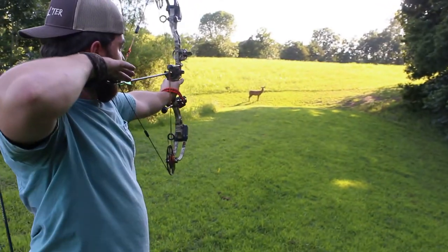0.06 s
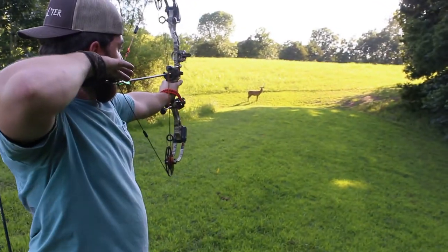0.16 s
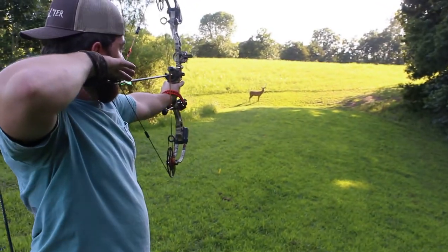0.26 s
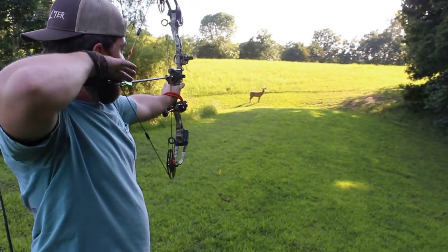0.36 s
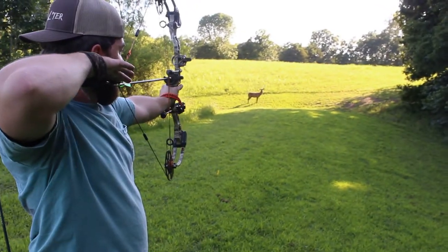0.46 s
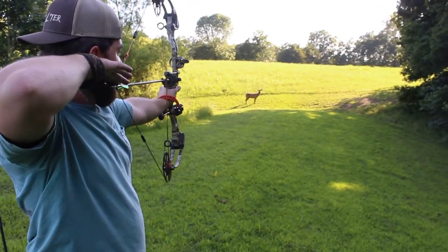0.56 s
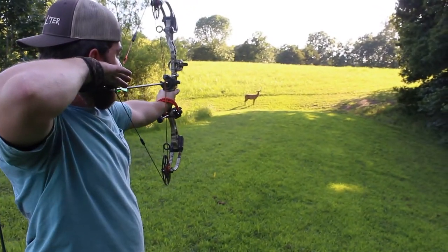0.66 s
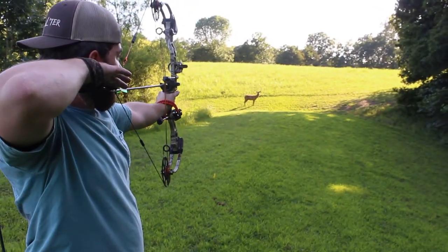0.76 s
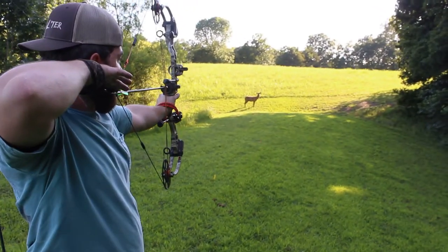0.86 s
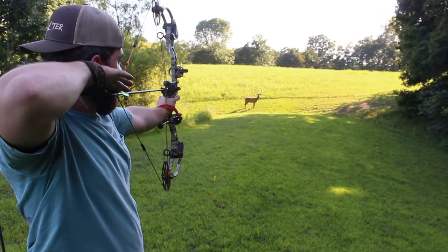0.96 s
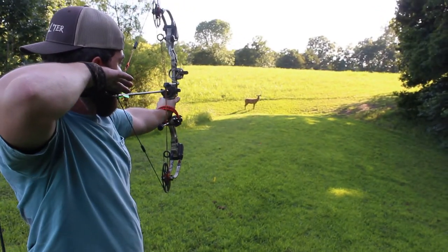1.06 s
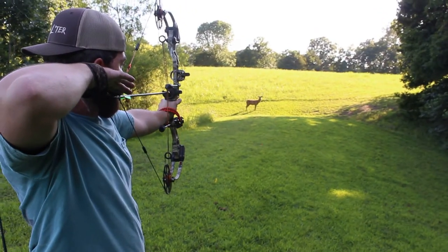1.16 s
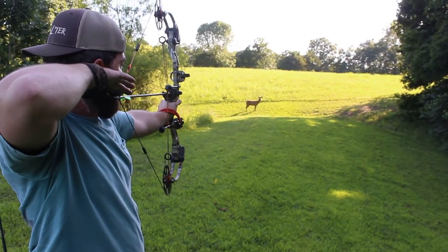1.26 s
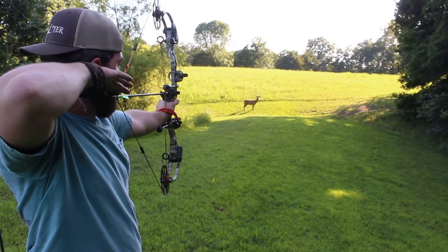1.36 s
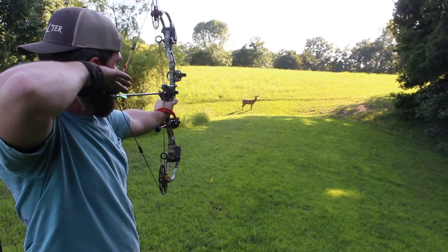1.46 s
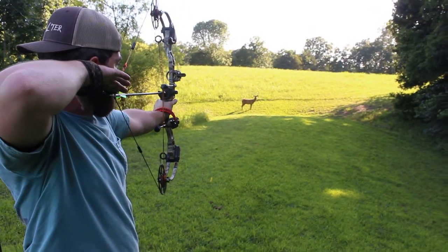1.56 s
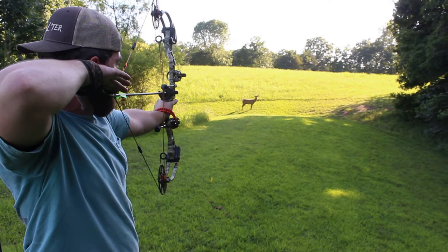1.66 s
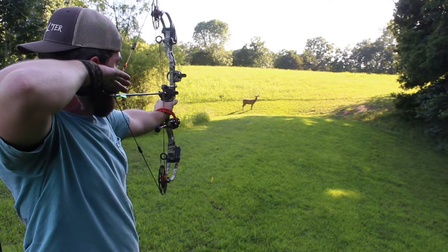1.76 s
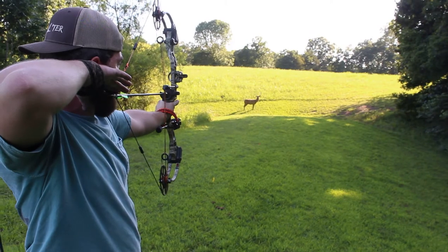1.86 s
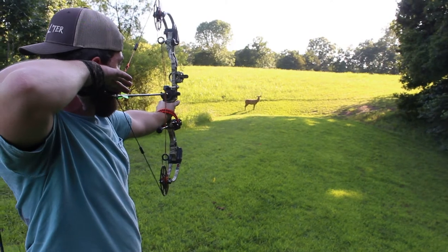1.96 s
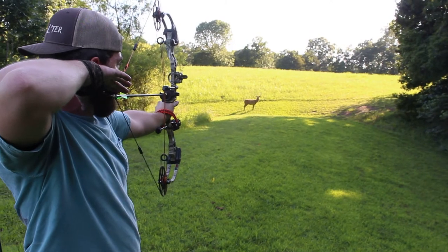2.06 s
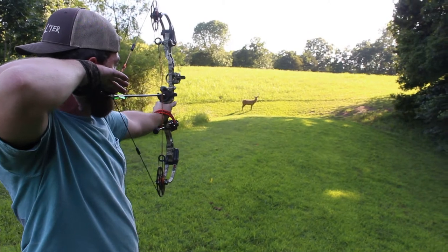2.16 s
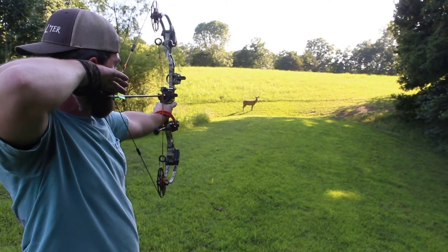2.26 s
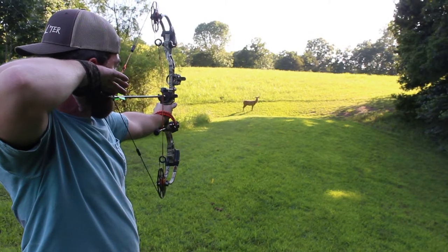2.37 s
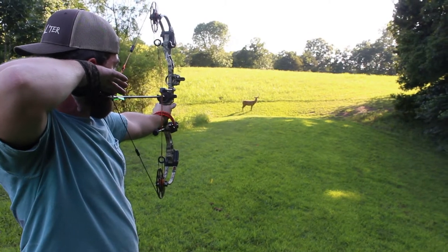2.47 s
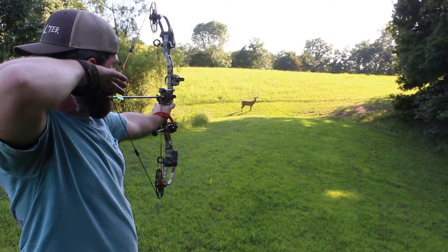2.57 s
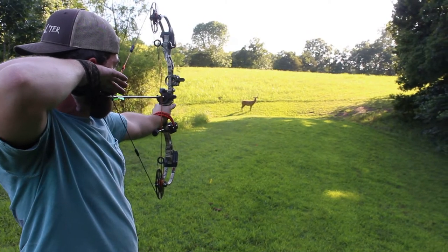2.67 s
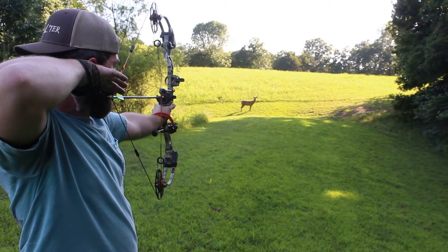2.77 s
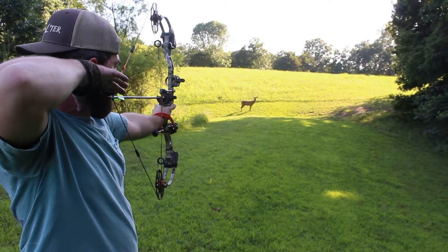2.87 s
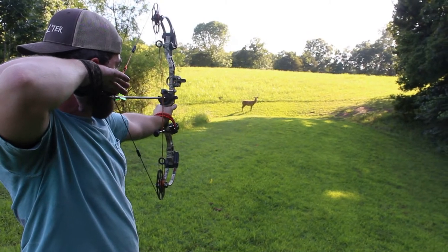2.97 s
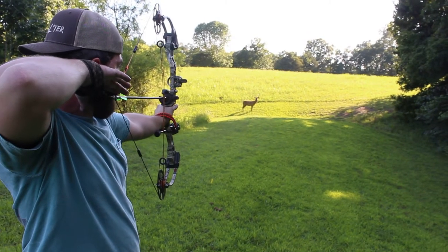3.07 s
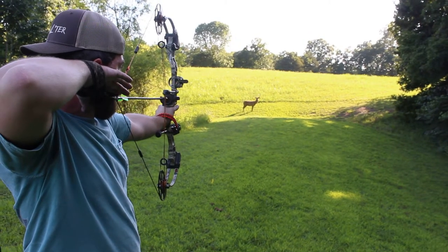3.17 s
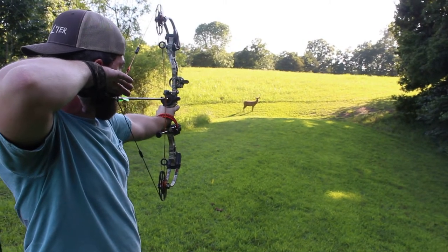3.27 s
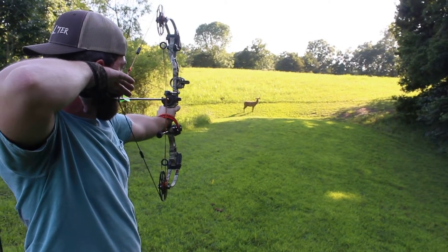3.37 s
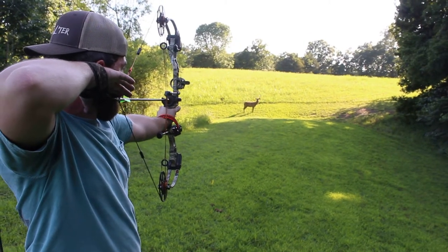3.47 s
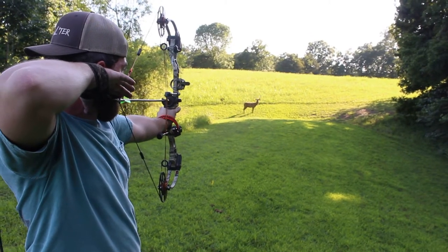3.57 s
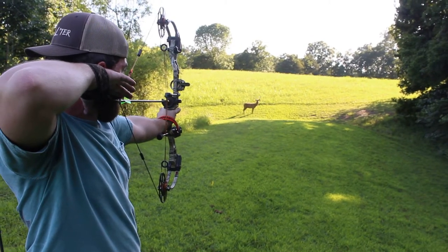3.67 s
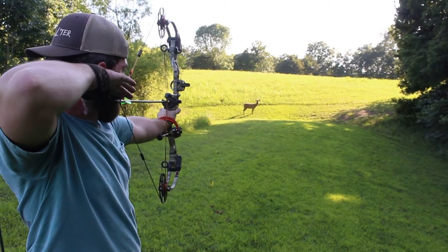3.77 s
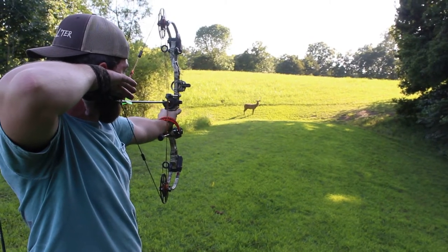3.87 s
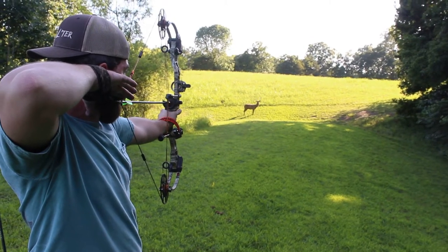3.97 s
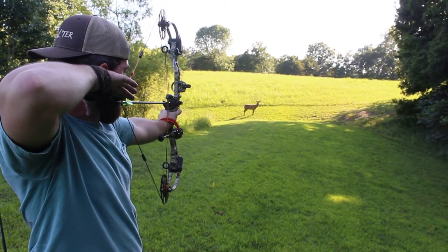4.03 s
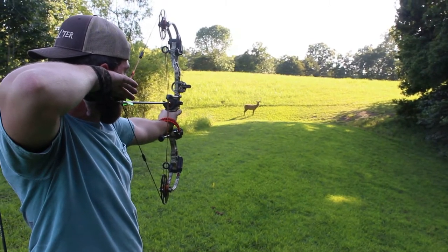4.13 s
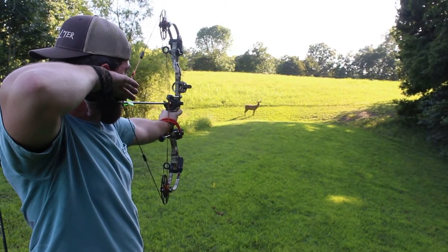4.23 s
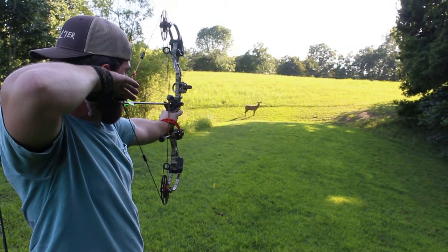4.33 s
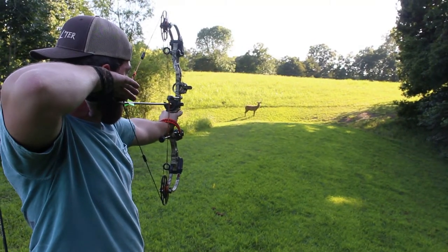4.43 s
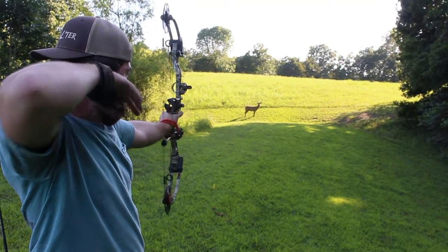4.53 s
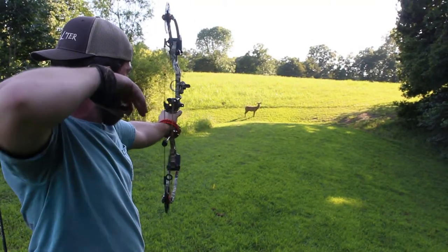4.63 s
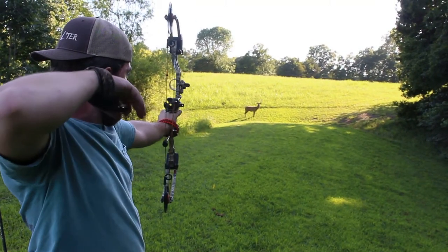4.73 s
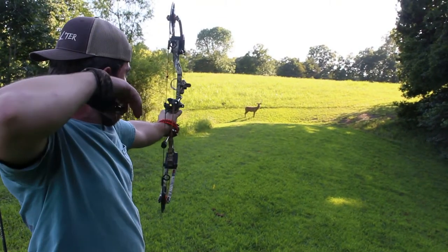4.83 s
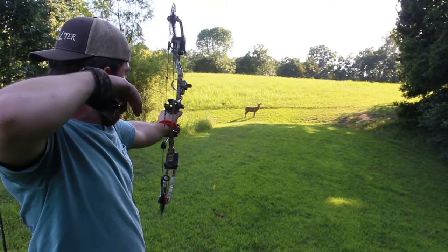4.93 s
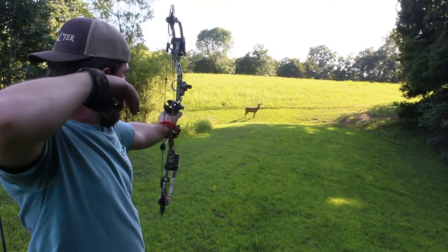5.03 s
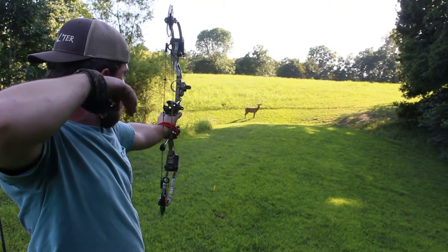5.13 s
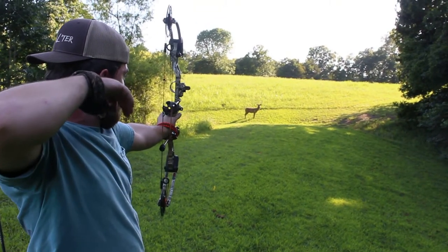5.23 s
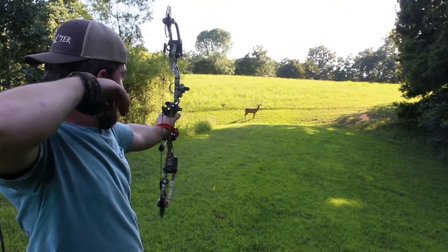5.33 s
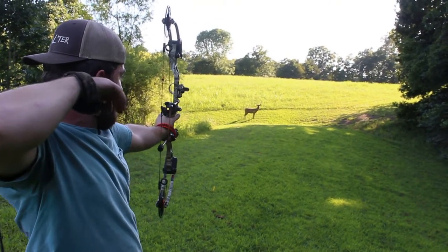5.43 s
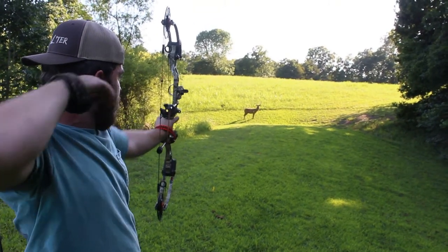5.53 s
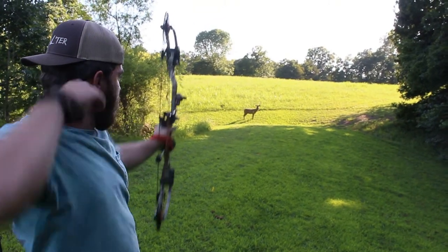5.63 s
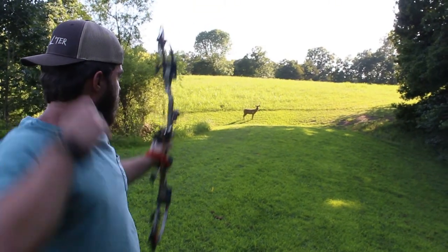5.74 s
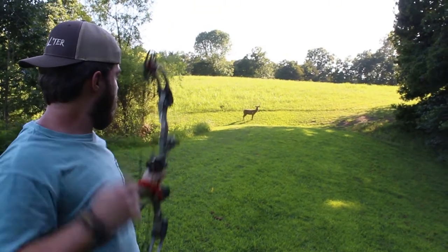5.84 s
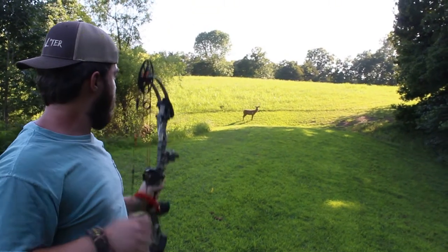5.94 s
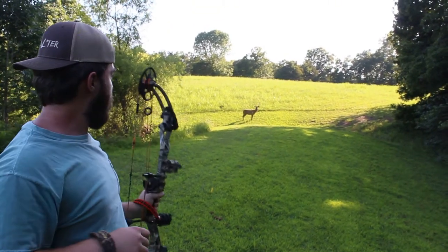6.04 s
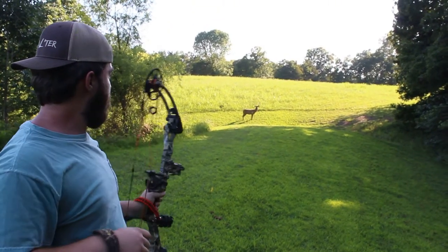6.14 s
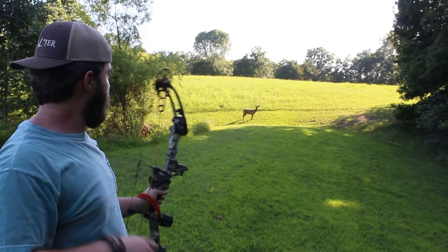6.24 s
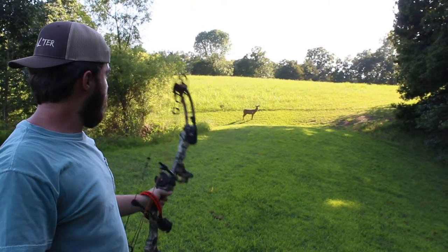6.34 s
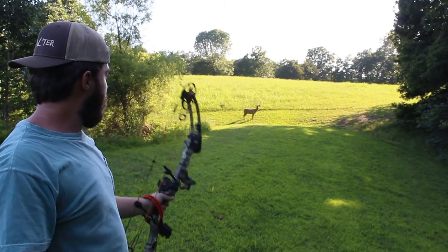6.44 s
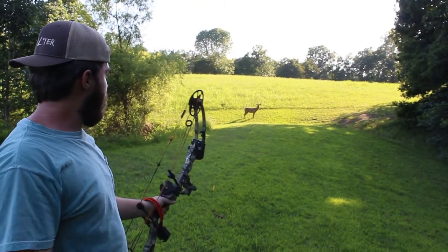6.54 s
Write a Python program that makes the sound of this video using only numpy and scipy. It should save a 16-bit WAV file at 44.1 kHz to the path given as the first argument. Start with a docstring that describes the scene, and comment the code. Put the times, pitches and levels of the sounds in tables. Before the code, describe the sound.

Outdoors in a summer meadow, katydids rasp rhythmically at high pitch while far birds chip and faint ticks sound near the microphone. After a long aim, a bow release clicks and the string slaps very loudly close by, rattling and humming. Under half a second later the arrow cracks and booms into foam, echoing from trees. Low bumps and a dry snap follow as the bow comes down.

```python
"""An archer shoots a compound bow close by, over a summer meadow.
The release clicks, the string slaps home and hums, and the arrow thumps into a foam target that the trees echo.
Struck parts are pulses and dying sines; scrape, rattle, echo and air are shaped noise.
Katydids rasp (pulsing noise), far birds chip (falling tones), a distant roar swells once,
and soft low bumps reach the microphone."""
import sys
import numpy as np
from scipy import signal
from scipy.fft import rfft, irfft
from scipy.io import wavfile
from scipy.ndimage import uniform_filter1d

SR = 44100
rng = np.random.default_rng(int(sys.argv[2]) if len(sys.argv) > 2 else 0)


def master_out(mix):
    """Clip the mix to full scale and print it as 16-bit PCM to the path in sys.argv[1]."""
    frames = np.transpose(np.atleast_2d(mix))
    ceiling = np.clip(frames, -1, 1)
    pcm = np.round(ceiling * 32767).astype(np.int16)
    wavfile.write(sys.argv[1], SR, pcm)


N = 291060
TIME = np.arange(N) / SR


def amp(db):
    """Turns decibels into a gain."""
    return 10 ** (np.asarray(db) / 20)


def unit(x):
    """Scales a signal to an rms of 1."""
    return x / np.sqrt(np.mean(x ** 2) + 1e-20)


def read(points, hz):
    """Reads a table of (Hz, value) along a log-frequency axis."""
    f, value = np.transpose(points)
    return np.interp(np.log(hz + 1), np.log(f + 1), value)


def add(mix, s, sound):
    """Mixes a sound in at time s."""
    part = mix[max(round(s * SR), 0):][:len(sound)]
    part += sound[:len(part)]


def noise(colour):
    """Steady noise of rms 1; the colour lists (Hz, relative dB)."""
    spectrum = rfft(rng.standard_normal(N))
    gain = amp(read(colour, np.fft.rfftfreq(N, 1 / SR)))
    return unit(irfft(spectrum * gain, N))


def click(colour, size=2048):
    """The tightest pulse of this colour that starts at once and never before (minimum phase), peak 1."""
    log_gain = np.log(amp(read(colour, abs(np.fft.fftfreq(size, 1 / SR)))))
    pulse = np.fft.ifft(np.exp(np.conj(signal.hilbert(log_gain)))).real[:size // 2]
    return pulse / abs(pulse).max()


def ring(modes, rise=.0001):
    """Dying sines of a struck object; a mode may start late, and a softer blow builds it up more slowly."""
    out = np.zeros(SR)
    for hz, db, t60, *delay in modes:
        t = np.maximum(TIME[:SR] - sum(delay), 0)
        build_up = 1 - np.exp(-(t / rise) ** 2)
        out += amp(db - 60 * t / t60) * np.sin(2 * np.pi * hz * t) * build_up
    return out


def contact(decay, grit):
    """One hard touch followed by a brief scatter of micro-impacts, which carry mostly treble."""
    scatter = np.diff(rng.standard_normal(SR // 20 + 1))
    force = grit * scatter * np.exp(-TIME[:SR // 20] / decay)
    force[0] += 1
    return force / np.linalg.norm(force)


def swell(s, rise, fall):
    """An envelope that grows to 1 at time s and dies away."""
    return np.exp(-np.maximum((s - TIME) / rise, (TIME - s) / fall))


def strike(rows, body):
    """Plays a body's sound at each (start in seconds, level in dB)."""
    out = np.zeros(N)
    for s, db in rows:
        add(out, s, amp(db) * body)
    return out


def air():
    """Distant wash of leaves and country, drifting slowly in level, and one far swell of low roar."""
    # Colour of the meadow air. Each row: frequency in Hz, relative level in dB.
    air_colour = [(18, -31), (30, -1), (102, -4.5), (130, 0.5), (161, -6), (213, -2.5), (283, -6.5),
                  (476, -9), (1590, -16.5), (2670, -18.5), (3380, -20), (6550, -25), (8500, -26),
                  (11000, -52), (18700, -120)]
    # Colour of the distant roar. Each row: frequency in Hz, relative level in dB.
    roar_colour = [(60, -25), (190, -1), (400, 0), (600, -8), (1000, -17), (2500, -40)]
    air_db, roar_db = -51.5, -56
    roar_at_s, roar_width_s = 3.55, .65
    drift_db = .5 * noise([(2, 0), (10, -23), (60, -100)])
    wash = amp(air_db + drift_db) * noise(air_colour)
    roar_shape = np.exp(-((TIME - roar_at_s) / roar_width_s) ** 2 / 2)
    return wash + amp(roar_db) * noise(roar_colour) * roar_shape


def bird(smear_hz=230):
    """Thin chips that all fall in pitch at the same rate, smeared and prolonged by the woods."""
    # Far bird chips. Each row: start in seconds, starting pitch in Hz, level in dB before shaping.
    chips = [(.33, 7350, -57), (1.24, 6950, -59.5), (1.57, 4760, -58), (2.15, 7380, -51.5),
             (2.3, 3180, -56), (3.18, 7340, -51.5), (3.21, 2780, -56.5), (3.405, 2750, -54.5),
             (4.045, 7280, -55.5), (5.31, 7450, -54), (6.22, 7180, -57.5)]
    fall_hz_per_s, rise_s, decay_s = 4800, .0075, .06
    woods_t60_s, woods_db = .8, -2
    out, t = np.zeros(N), TIME[:SR // 3]
    blur = noise([(smear_hz / 2, 0), (smear_hz, -6), (500, -25), (2000, -80)])
    envelope = (1 - np.exp(-t / rise_s)) * np.exp(-t / decay_s)
    for s, hz, db in chips:
        tone = np.sin(2 * np.pi * np.cumsum(hz - fall_hz_per_s * t) / SR)
        add(out, s, amp(db) * tone * envelope)
    woods = rng.standard_normal(SR) * amp(-60 * TIME[:SR] / woods_t60_s)
    tail = signal.fftconvolve(out, woods / np.linalg.norm(woods))[:N]
    return out * blur + amp(woods_db) * tail


def lisp_level(count=24):
    """Rounded lisps follow the beat of each bout, each a little off in time and strength."""
    # The nearest katydid sings quick short lisps, then long ones, then slightly slower still.
    # Each row: first lisp in seconds, end in seconds, period in seconds, lisp length in seconds, level in dB.
    bouts = [(.02, 1.22, .0975, .076, -57.2), (1.315, 3.3, .1898, .118, -55.7),
             (3.422, 6.7, .1974, .12, -55.8)]
    spread_db, jitter_s = .7, .002
    level = np.zeros(N)
    for start, end, period, length, db in bouts:
        late, louder = rng.standard_normal((count, 2)).T
        beats = start + period * np.arange(count)
        starts = (beats + jitter_s * late)[beats < end]
        for s, lisp_db in zip(starts, db + spread_db * louder):
            level += amp(lisp_db) * np.exp(-(2 * abs(TIME - s) / length) ** 3)
    return level


def katydids(stroke_hz=118, depth=0.45, uneven_db=1.6):
    """Each lisp is a run of uneven wing strokes on a narrow, very high resonance; others blur into a chorus."""
    # Colour of the far insects. Each row: frequency in Hz, relative level in dB.
    chorus_colour = [(3000, -40), (5700, -17), (6450, -1.5), (7600, -24), (8800, -9.5), (9600, 1),
                     (10200, -1), (10700, -12), (11300, -7), (11800, -16), (12050, -10), (12500, -18),
                     (13600, -16), (15500, -21)]
    pace = 1 + 0.0401 * noise([(5, 0), (40, -60), (200, -120)])
    turns = np.cumsum(stroke_hz * pace) / SR
    strokes = 1 + depth * np.cos(2 * np.pi * turns)
    strokes *= amp(uneven_db * noise([(3, -14), (15, 2), (60, -8), (300, -70)]))
    wing = noise([(6000, -55), (8700, -29), (9250, -9.5), (9650, -1), (9950, -8.5), (10500, -28), (13000, -57)])
    throb_db = 1.8 * noise([(1, -25), (5, -3), (11, 3), (16, -19), (80, -100)])
    chorus = amp(-62.0 + throb_db) * noise(chorus_colour)
    return lisp_level() * wing * strokes + chorus


def bumps(lump_db=4.5, rumble_db=-3.5):
    """Soft pressure pushes of about one cycle, over a lumpy rumble that plays the weaker ones."""
    # The strongest low bumps. Each row: middle in seconds, level in dB before shaping, pitch in Hz.
    pushes = [(.03, -34, 90), (2.233, -29, 58), (2.432, -27, 130), (2.446, -20, 65), (3.168, -32, 72),
              (4.268, -19.5, 65), (4.357, -22, 80), (4.391, -22, 85), (4.473, -28, 50), (5.585, -22.5, 80),
              (5.675, -23, 70), (5.787, -17.5, 70), (6.145, -25.5, 55), (6.558, -25, 75)]
    # The rumble settles, returns during the aim and grows as the bow comes down.
    # Each row: time in seconds, level in dB before rumble_db and the lumps are added.
    rumble_path = [(0, -42), (.35, -63), (2.1, -65), (2.3, -50.5), (3.3, -49), (3.8, -48), (4.4, -47),
                   (4.8, -48), (5.2, -56), (5.8, -42), (6.3, -49), (6.6, -37)]
    bump_cycles = .34  # a bump grows and dies by a factor e within this share of a cycle
    level_db = np.interp(TIME, *np.transpose(rumble_path)) + rumble_db
    level_db += lump_db * noise([(2, -7), (10, -1), (18, -10), (70, -90)])
    out = amp(level_db) * noise([(8, -10.5), (25, 0.5), (65, -1.5), (110, -7), (200, -19.5), (600, -51), (3000, -90)])
    t = TIME[:SR // 5] - .1  # time from the middle of a bump
    for s, db, hz in pushes:
        add(out, s + t[0], amp(db) * np.sin(2 * np.pi * hz * t) * np.exp(-abs(hz * t) / bump_cycles))
    return out


def small_clicks():
    """Dry snaps, and faint ticks that each have their own grain before they ring; fainter ones fall at random."""
    # Small sharp snaps of the gear after the shot. Each row: start in seconds, level in dB.
    snaps = [(4.8213, -20), (5.8614, -16.5), (5.8671, -32), (5.9278, -38)]
    # Colour of one snap. Each row: frequency in Hz, relative level in dB.
    snap_colour = [(200, -22), (1000, -11.5), (2000, -20), (4000, -8), (6500, -3), (8500, 1.5),
                   (10500, -10), (14000, -32)]
    # Faint ringing ticks close by. Each row: start in seconds, level in dB added to the ring and the grain.
    set_ticks = [(.141, -4.5), (.166, -1.5), (.349, 0), (1.078, 2), (2.679, -3), (2.696, -2.5),
                 (2.795, -5.5), (3.125, -2.5), (4.291, -3), (5.618, -5), (6.089, -0.5), (6.308, -3)]
    # The ring of one tick. Each row: pitch in Hz, level in dB, time to fall by 60 dB in seconds.
    tick_modes = [(2660, -44.5, 0.048), (3540, -42.5, .012), (4250, -45, .008), (5080, -40.5, 0.011),
                  (7900, -46, .005), (10400, -45, .005)]
    stray_per_s, stray_db = .8, -11
    slots = np.arange(0, N / SR, .1)
    slot_s = slots[1]
    chance = rng.random((len(slots), 2))
    strays = [(s + slot_s * late, stray_db) for s, (draw, late) in zip(slots, chance)
              if draw < stray_per_s * slot_s]
    ticks = set_ticks + strays
    out = strike(snaps, signal.fftconvolve(contact(0.00063, grit=0.22), click(snap_colour)))
    out += strike(ticks, ring(tick_modes))
    out += strike([(4.8213, -46.5)], ring([(855, -0.5, 0.12), (1020, -1, 0.07)]))  # the first snap knocks dully too
    grain = noise([(1000, -20), (2700, -3), (4000, -4), (5350, 1), (6500, -7), (10000, -5), (14000, -20)])
    grain_level = sum(amp(db) * swell(s, .0004, .003) for s, db in ticks)
    return out + amp(-48) * grain * grain_level


def tree_echo(s, clump_db=1.3):
    """Leaves and trunks return a tail in uneven clumps; its treble dies sooner."""
    # Colour of the tree line's echo. Each row: frequency in Hz, relative level in dB.
    echo_colour = [(60, -14), (160, 0), (320, 4.5), (700, -1), (1800, -4), (3200, -14), (6500, -12),
                   (10000, -24), (15000, -45)]
    # How long the echo lasts. Each row: frequency in Hz, time to fall by 60 dB in seconds.
    echo_t60 = [(150, 0.82), (700, 1.02), (2000, 0.69), (7000, 0.29)]
    hz, t, z = signal.stft(noise(echo_colour), SR, nperseg=256)
    # smooth random levels over neighbouring frequencies, then over time
    clumps = uniform_filter1d(rng.standard_normal(z.shape), 5, 0)
    clumps = unit(uniform_filter1d(clumps, 4, 1))
    z = z * amp(clump_db * clumps)
    z = z * amp(-60 * np.maximum(t - s, 0) / read(echo_t60, hz)[:, None])
    fade_in = np.clip((TIME - s - .006) / 0.02, 0, 1)
    return signal.istft(z, SR, nperseg=256)[1][:N] * fade_in


def target(s=4.9964):
    """The point cracks through the skin, then the foam booms as it brakes the shaft; the trees answer."""
    # The foam body and the arrow shaft. Each row: pitch in Hz, level in dB,
    # time to fall by 60 dB in seconds, delay in seconds as the arrow drives in.
    foam_modes = [(110, -31.5, .06, .004), (185, -26.5, 0.077, .0035), (251, -26.5, .055, 0.0044),
                  (405, -21, 0.015, 0.0021), (540, -21, 0.023, .004), (635, -19.5, .02, 0.00897),
                  (950, -25, .015, .002), (1450, -22, 0.026, 0.00043), (1890, -21.5, 0.027, 0.00048),
                  (2380, -24, 0.014, 0.00041), (3100, -29, 0.016, 0.00037)]
    # Colour of the crack. Each row: frequency in Hz, relative level in dB.
    crack_colour = [(100, 0), (700, -8), (1700, 9), (3000, -5.5), (4500, -18), (6400, -5.5), (9000, -17.5),
                    (14000, -36)]
    crack = -signal.fftconvolve(contact(0.0029, grit=.05), click(crack_colour))
    boom = ring(foam_modes, rise=0.00016)
    return strike([(s, -7)], crack) + strike([(s, 0)], boom) + amp(-38.5) * tree_echo(s)


def release():
    """The jaw's steel rings; the arrow scrapes faintly over the rest, fades, then hisses loudly at the slap."""
    # The release jaw opens and rebounds. Each row: start in seconds, level in dB added to the steel's levels.
    jaw_hits = [(4.5238, -33), (4.5288, -20), (4.5297, 2), (4.5306, -16), (4.5358, -17)]
    # The jaw's steel parts. Each row: pitch in Hz, level in dB, time to fall by 60 dB in seconds.
    jaw_modes = [(3500, -9, 0.0095), (3780, -12, 0.011), (4240, -19, .005), (6800, -10.5, .006),
                 (7300, -14, .005), (9060, -8, .005), (10400, -10, .004), (10870, -0.5, .0045),
                 (12100, -10, 0.0048)]
    scrape = noise([(100, -1), (600, -1), (1500, -3), (2400, -5), (3500, 1), (6000, 0), (11000, -3), (15000, -18)])
    slide = amp(-26) * swell(4.53, .002, 0.0062) + amp(-8) * swell(4.5495, 0.0018, 0.0024)
    return strike(jaw_hits, ring(jaw_modes, rise=0.00026)) + scrape * slide


def bow(count=6):
    """The string slaps home and the limbs rebound; the frame rings and rattles, the string hums on."""
    # The string slaps home and cams and limbs hit their stops; the last row is a stronger rebound of the limbs.
    # # Each row: start in seconds, level in dB.
    hits = [(4.5491, 0.5), (4.5503, 9.5), (4.5515, 12.5), (4.5521, 8.5), (4.5699, -10)]
    # Colour of one blow. Each row: frequency in Hz, relative level in dB.
    slap_colour = [(60, -28), (200, -7.5), (450, -7), (800, -3.5), (1200, -7.5), (2000, 6), (3200, -6),
                   (5000, -4.5), (8000, -6), (12500, -19), (15000, -35)]
    # Riser, limbs and cables. Each row: pitch in Hz, level in dB, time to fall by 60 dB in seconds.
    frame_modes = [(195, -17.5, 0.09), (253, -34, 0.24), (325, -23, .1), (567, -28, 0.055),
                   (688, -5.5, 0.026), (888, -4, 0.025), (830, -37, .2), (1160, -34, .1), (1367, -32, .12),
                   (1660, -16, 0.014), (2126, -40, .14), (2455, 0.5, 0.015), (2760, -6, 0.015),
                   (3424, -30, 0.14), (3710, -5.5, .014), (4430, -4, .012), (5220, -11, .012),
                   (6430, -16, 0.011), (6514, -49.5, .16), (7400, -12, .012), (8032, -42, .18),
                   (9636, -53, .15), (11400, -46, .08)]
    # Colour of the rattle. Each row: frequency in Hz, relative level in dB.
    rattle_colour = [(60, -6), (200, -6), (420, -0.5), (800, 2.5), (1300, -5), (3000, -9), (5000, -15),
                     (8000, -10), (11000, -14), (15000, -32)]
    blow_decay_s = .00058
    # the limbs rebound at a steady pace, weaker each time
    rebound_at_s, rebound_every_s, rebound_decay_s = 4.555, .0074, .001
    rebound_db, rebound_loss_db = -6.5, 5
    blows = [(s, db, blow_decay_s) for s, db in hits]
    for k in range(count):
        blows.append((rebound_at_s + k * rebound_every_s, rebound_db - k * rebound_loss_db, rebound_decay_s))
    slap, pulse = np.zeros(N), click(slap_colour)
    for s, db, decay in blows:
        add(slap, s, amp(db) * signal.fftconvolve(contact(decay, grit=0.29), pulse))
    frame = strike([(4.5492, 0)], ring(frame_modes, rise=0.0009))
    # two strands, a little apart in pitch, beat as they die
    string = strike([(4.552, -37.5)], ring([(322, 0.22, 0.92), (303, -2, .22)]))
    after = np.clip((TIME - 4.551) / .004, 0, 1)  # silent until the slap, then fades in
    rattle = amp(-20.3) * noise(rattle_colour) * swell(4.564, .03, .013) * after
    rattle *= amp(2.5 * noise([(30, -10), (200, 0), (700, -10), (3000, -70)]) - .7)  # loose parts chatter in clumps
    # the crack scatters back from grass and nearby bushes
    scatter = noise([(100, -11), (1000, -3), (3500, 6), (8000, 2), (11000, -8), (15000, -19)])
    scatter *= amp(-45.0) * swell(4.6, .02, 0.077) * after
    return slap + frame + string + rattle + scatter


def scene():
    """Adds all sources at the one microphone."""
    background = air() + bird() + katydids() + bumps() + small_clicks()
    return (background + target() + release() + bow())[None]


def record(dry, threshold_db=-20, recover_db=45, share=0.47):
    """The shot overloads the input and ducks the gain for a moment; then the treble is cut off."""
    edge_hz = 15200
    clipped = np.clip(dry[0], -1, 1)
    power = signal.lfilter([1 / 400], [1, 1 / 400 - 1], clipped ** 2)
    power_db = 10 * np.log10(power + 1e-12)
    # hold each peak of the level and let it sink by recover_db per second
    fall = recover_db * TIME
    held_db = np.maximum.accumulate(power_db + fall) - fall
    over_db = np.maximum(held_db - threshold_db, 0)
    duck_db = signal.lfilter([1 / 800], [1, 1 / 800 - 1], share * over_db)
    low_pass = signal.firwin(255, edge_hz, window=("kaiser", 8), fs=SR)
    return signal.fftconvolve(clipped / amp(duck_db), low_pass, "same")[None]


dry = scene()
out = record(dry)
master_out(out)
```